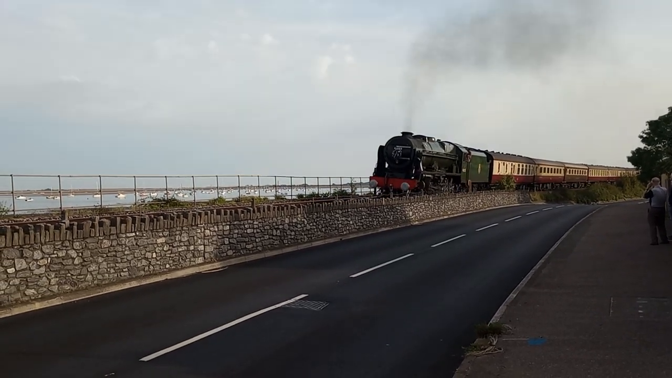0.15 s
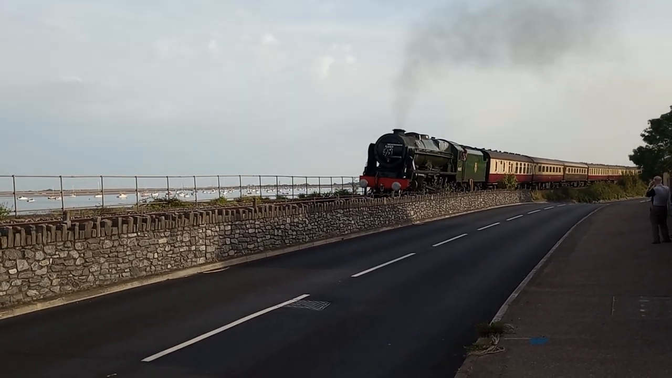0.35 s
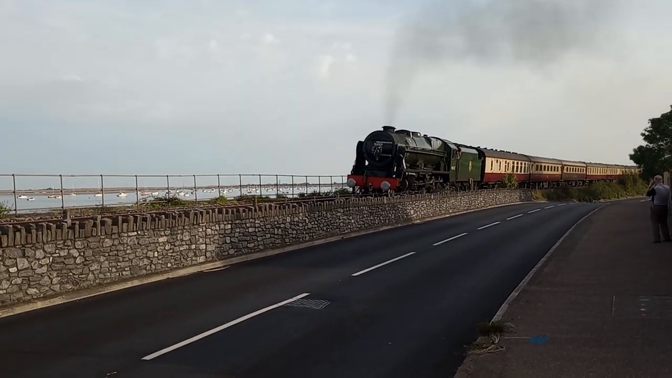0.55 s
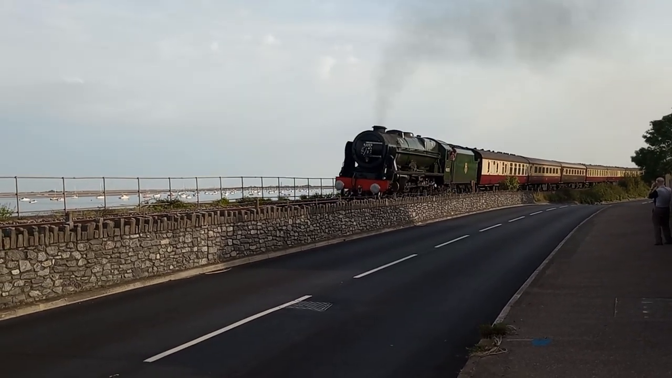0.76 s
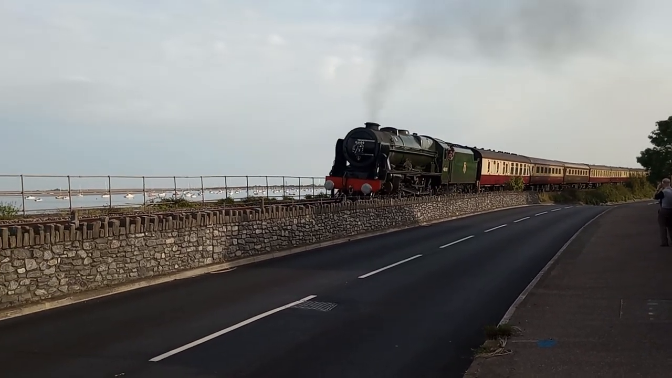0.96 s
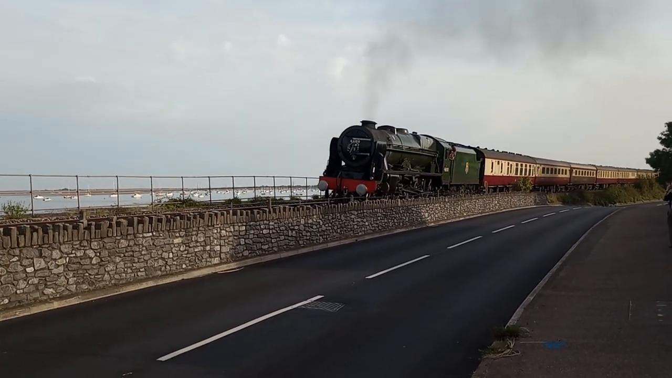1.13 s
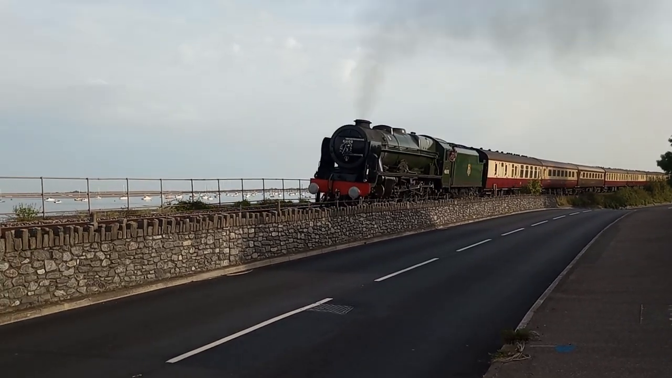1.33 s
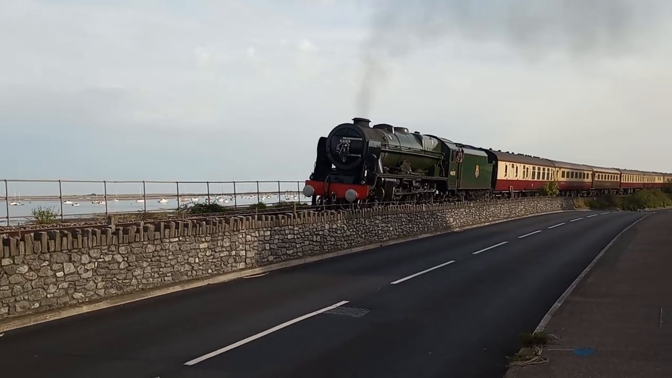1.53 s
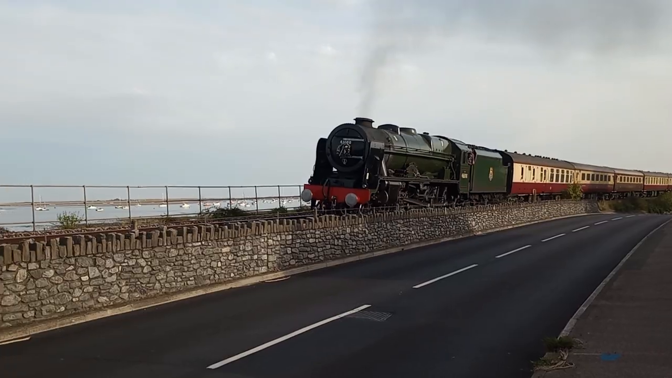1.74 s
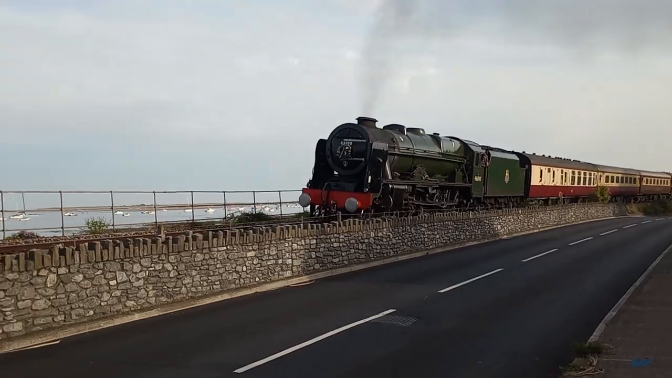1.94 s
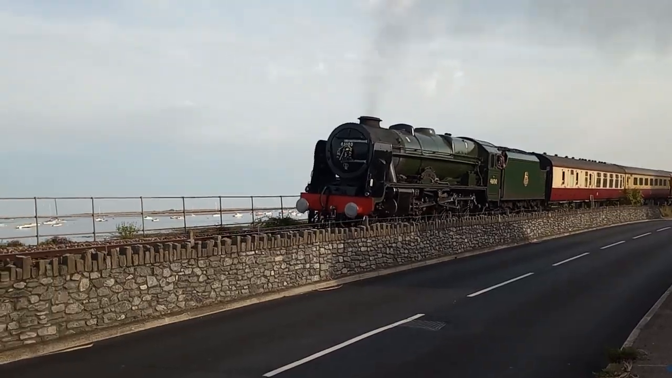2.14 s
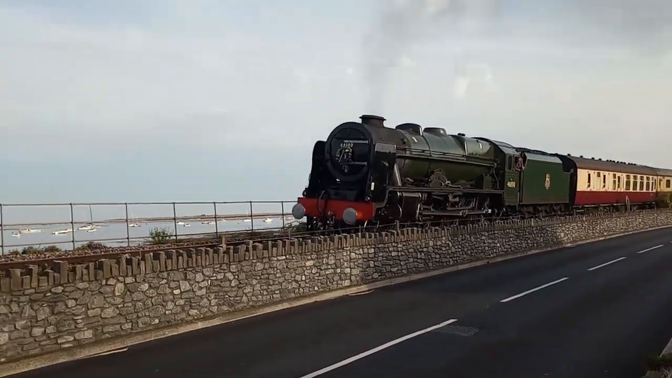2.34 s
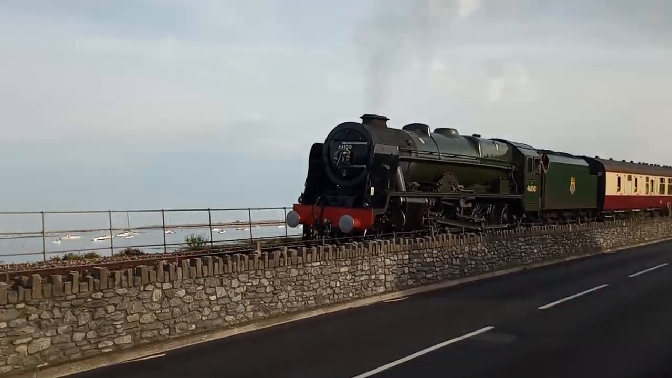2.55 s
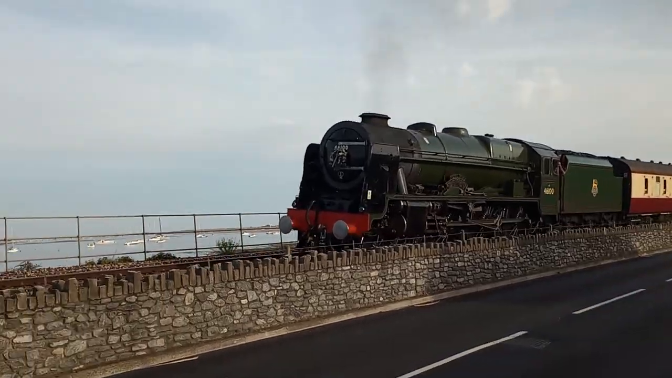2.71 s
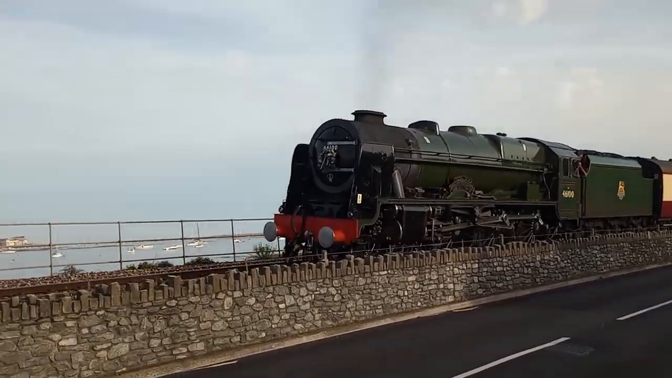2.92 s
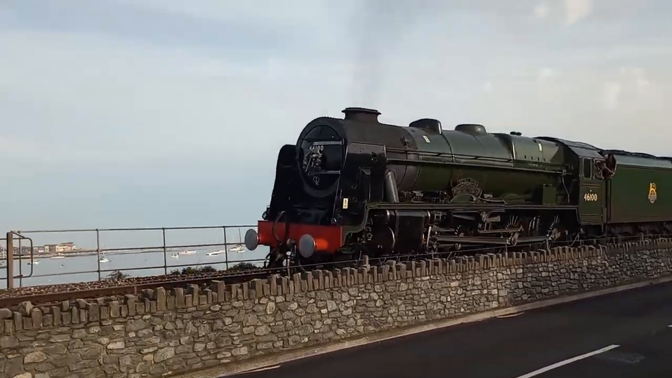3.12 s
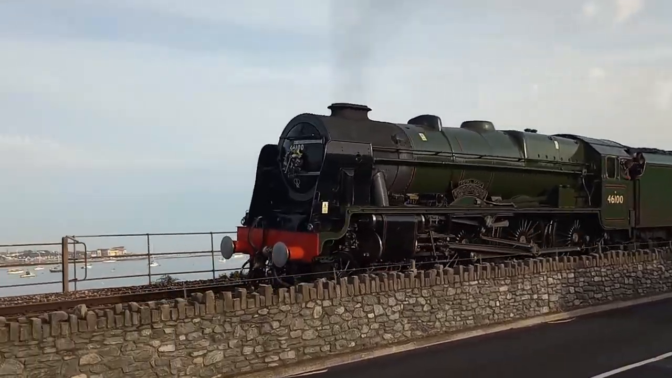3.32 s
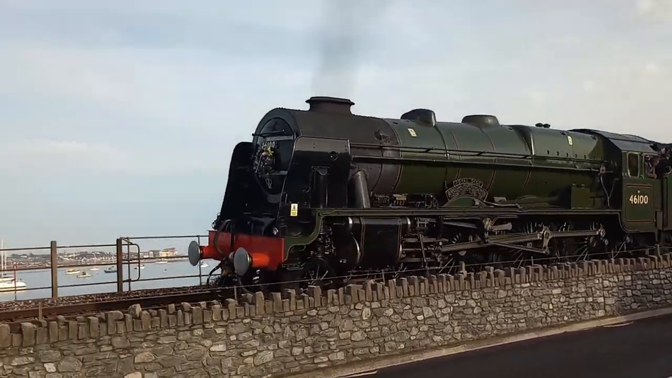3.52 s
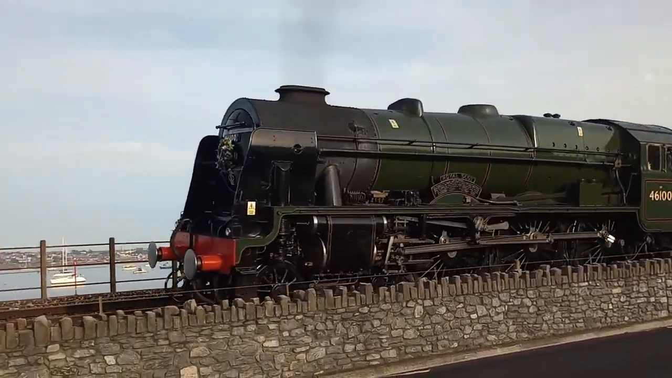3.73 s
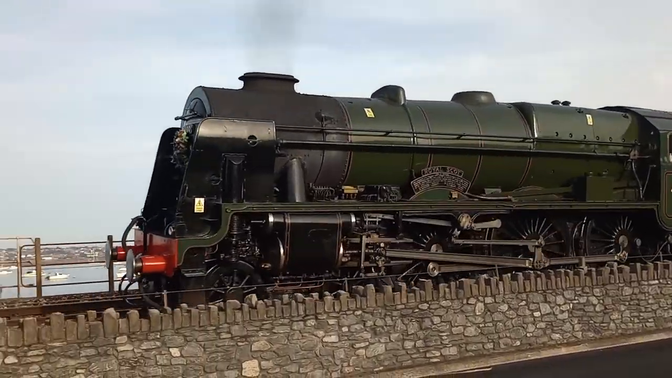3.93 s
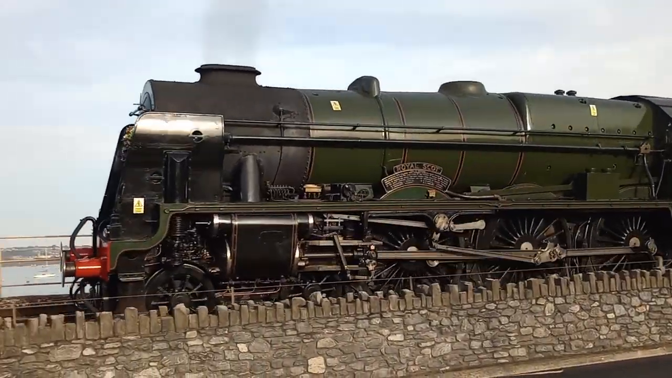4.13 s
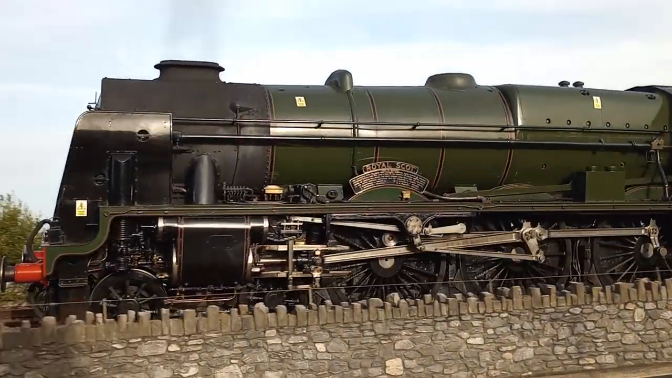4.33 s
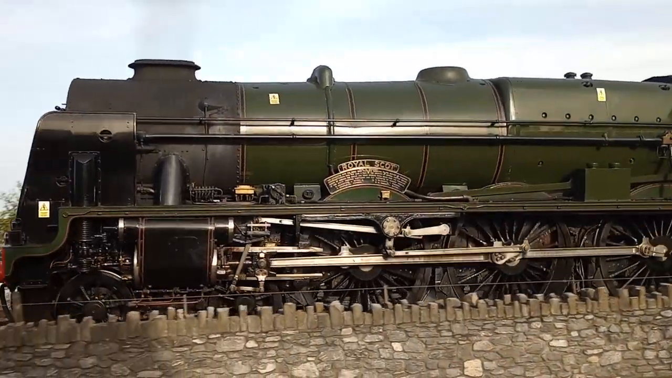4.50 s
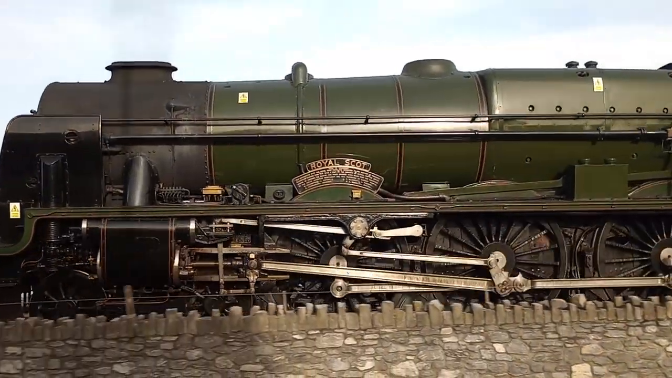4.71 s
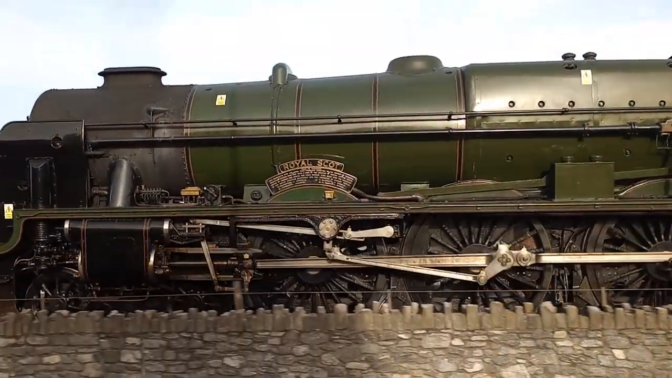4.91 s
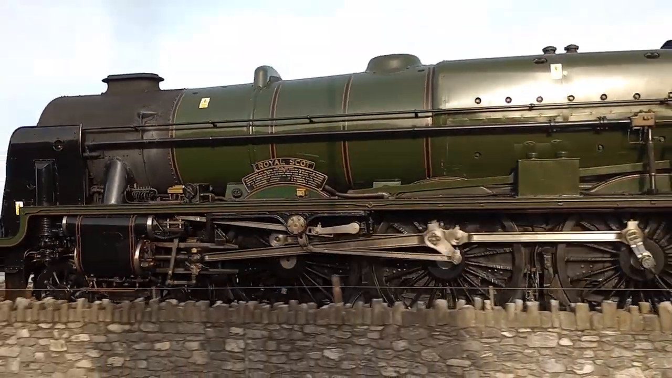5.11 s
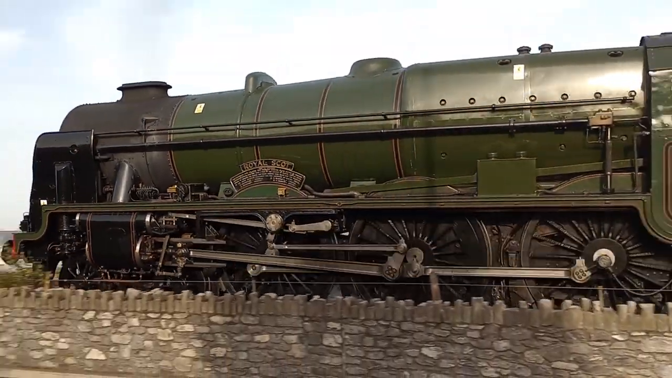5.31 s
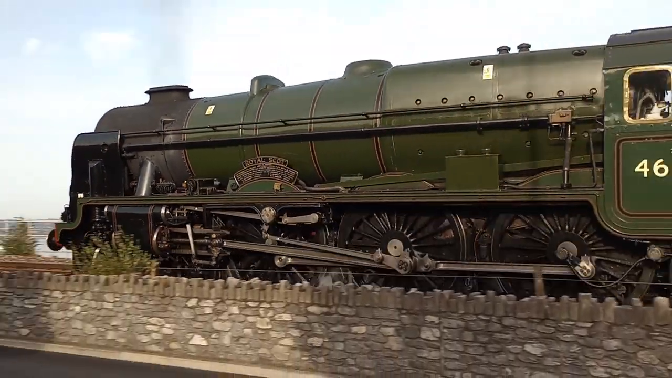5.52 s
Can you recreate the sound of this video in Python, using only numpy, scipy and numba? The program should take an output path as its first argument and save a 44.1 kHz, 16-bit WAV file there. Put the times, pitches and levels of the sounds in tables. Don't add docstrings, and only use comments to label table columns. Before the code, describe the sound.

Rapid breathy exhaust beats boom through a chimney, uneven in strength but steady in pace. Low rumble and leaking steam fill the gaps, with tiny high chirps in the first two seconds. The engine grows steadily louder and clearer, passing close from about four seconds with singing rails, wheel noise and three late metal knocks. Open roadside, short reflections from wall and road, heard on a phone's stereo microphones.

```python
import sys
import numpy as np
from scipy import signal
from scipy.fft import rfft, irfft, next_fast_len
from scipy.io import wavfile
from scipy.ndimage import uniform_filter1d, map_coordinates
from numba import njit

SR = 44100
rng = np.random.default_rng(int(sys.argv[2]) if len(sys.argv) > 2 else 0)


def volts_from_decibels(level):
    exponent = np.asarray(level, float) / 20
    return 10 ** exponent


def generate_wav(signal):
    frames = np.transpose(np.atleast_2d(signal))
    scaled = np.clip(frames, -1, 1) * 32767
    pcm = np.round(scaled).astype(np.int16)
    wavfile.write(sys.argv[1], SR, pcm)


N = 245195


def unit(x):
    return x / np.sqrt(np.mean(x ** 2))


def blend(far_near, near):
    far, close = far_near
    return far + (close - far) * near


def curves(table):
    s, *columns = np.transpose(table)
    return [np.interp(np.arange(N) / SR, s, c) for c in columns]


def walk(rate):
    hold = int(SR / rate)
    steps = np.repeat(rng.standard_normal(N // hold + 1), hold)
    return 1.13 * uniform_filter1d(uniform_filter1d(steps, hold), hold)[:N]


def colour(x, points):
    size = next_fast_len(N)
    hz, db = np.transpose(points)
    log_f = np.log(np.maximum(np.arange(size // 2 + 1) * SR / size, 1))
    gain = volts_from_decibels(np.interp(log_f, np.log(hz), db, left=-90))
    return irfft(rfft(x, size) * gain, size)[..., :N]


def split(x, low_hz, high_hz):
    band = signal.butter(3, [low_hz, high_hz], "band", fs=SR, output="sos")
    return unit(signal.sosfilt(band, x))


@njit
def svf(x, hz, width):
    y, b, l = np.empty_like(x), np.zeros(2), np.zeros(2)
    for i in range(x.shape[1]):
        g, k = np.tan(np.pi * hz[i] / SR), width / hz[i]
        for c in range(2):
            v = (b[c] + g * (x[c, i] - l[c])) / (1 + g * (g + k))
            b[c], l[c], y[c, i] = 2 * v - b[c], l[c] + 2 * g * v, k * v
    return y


# f/Hz, level/dB
SCATTER = [(60, -28), (200, -27), (380, -14), (700, -11.5), (1300, -5.8), (2400, -5.5), (4400, -3.5),
           (15000, -1)]


def air():
    shared, scattered = rng.standard_normal((2, N))
    scattered = colour(scattered, [(1, SCATTER[0][1])] + SCATTER)
    return shared + np.array([[1], [-1]]) * scattered


# t/s, nearness [0-1], blast level/dB
PASS = [(0, .01, -31), (.35, .02, -28), (.8, .08, -29.5), (1.2, .1, -27), (1.6, .2, -25), (2.0, .43, -23.5),
        (2.3, .5, -23), (2.6, .45, -22), (3.0, .55, -21.5), (3.3, .75, -18), (3.75, 1.07, -17),
        (4.1, .88, -18.5), (4.45, .97, -18.5), (4.75, .95, -17.6), (5.15, .86, -18), (5.56, .92, -19.5)]


def approach():
    return curves(PASS)


TURNS_S = [-0.397, 0.34, 1.077, 1.809, 2.538, 3.256, 3.977, 4.699, 5.438, 6.17]
# place in the turn [0-1], length [ms], strength level/dB,
# brightness level/dB, boom level/dB
PORTS = [
    (0, 67, 1.5, -.6, -2.5),
    (.159, 64, -.2, -.8, .4),
    (.331, 72, .6, -.9, -.3),
    (.492, 64, -.6, 1.8, -.4),
    (.657, 72, -4, .6, 1.5),
    (.825, 66, .6, -.3, -.3),
]
# t/s, strength level/dB, brightness level/dB, boom level/dB
ACCENTS = [(0.09, -0.7, -2.2, 1.5), (0.46, 1.9, 0.5, -3.5), (0.58, 3.0, 1.2, -0.3), (0.7, 2.9, 3.6, 5.2),
           (0.82, 2.7, -1.5, -2.1), (0.95, 1.8, -1.6, -0.3), (1.08, -1.8, 0.2, 5.4), (1.19, -0.9, 2.1, 1.2),
           (1.32, 1.1, -3.0, -7.5), (1.44, 1.6, -4.1, -5.1), (1.68, -2.5, -0.2, -3.9),
           (1.92, 1.5, -2.3, 1.7), (2.17, 1.9, -4.1, 1.0), (2.29, 5.1, -8.4, -2.7), (2.41, 1.8, -3.0, 2.9),
           (2.54, 1.9, -3.8, -1.0), (2.78, -0.5, 3.8, 9.4), (2.89, 1.6, -2.2, 0.7), (3.01, 1.0, 1.8, -2.2),
           (3.26, -0.1, 1.3, 6.9), (3.61, 1.3, 3.4, 3.5), (3.73, 2.2, -0.8, -4.4), (3.98, -0.6, 1.8, 2.5),
           (4.22, 1.3, -2.6, 0.6), (4.45, 2.6, -1.7, -0.5), (4.7, 1.3, -1.8, 1.8), (4.82, -1.2, -1.9, 1.1),
           (4.94, -2.2, 2.1, 3.3), (5.18, -3.9, 0.1, -1.3), (5.31, -2.3, -2.2, 3.1)]


def beats():
    place, *rest = np.transpose(PORTS)
    start = (np.array(TURNS_S[:-1])[:, None] + np.diff(TURNS_S)[:, None] * place).ravel()
    rows = np.column_stack([start, np.tile(rest, len(TURNS_S) - 1).T])
    rows = rows[(start > -.1) & (start < N / SR)]
    accents = np.array(ACCENTS)
    nearest_beat = np.abs(rows[:, :1] - accents[:, 0]).argmin(axis=0)
    rows[nearest_beat, 2:] += accents[:, 1:]
    return rows.T


def at_beats(curve):
    return curve[np.clip((beats()[0] * SR).astype(int), 0, N - 1)]


LENGTH_FAR_NEAR = (1.15, .9)


def puffs(level_db, late_s=0., power=1.):
    rise_s, fall_s, sag_s = .031, .038, .15
    t, flow = np.arange(N) / SR, np.zeros(N)
    starts, lengths_ms = beats()[:2]
    lengths_ms = lengths_ms * blend(LENGTH_FAR_NEAR, at_beats(approach()[0]))
    for start, ms, db in zip(starts, lengths_ms, level_db):
        i = slice(max(int((start - .1) * SR), 0), int((start + .3) * SR))
        age = t[i] - start - late_s
        opening = .5 + .5 * np.tanh(2 * age / rise_s)
        closing = .5 - .5 * np.tanh(2 * (age - ms / 1000) / fall_s)
        flow[i] += volts_from_decibels(db) * (1.253 * opening * closing * np.exp(-age / sag_s)) ** power
    return flow


# f/Hz, width [Hz]
OVERTONES = [(510, 183), (700, 68), (960, 89), (1350, 200), (1600, 340), (1920, 114)]
# far level/dB, near level/dB
OVERTONE_FAR_NEAR_DB = [(1.5, -5), (-7, -3.5), (5, .6), (3, -12), (-16, 1.5), (4, -1.5)]
# f/Hz, width [Hz], level/dB
NOZZLE = [(2413, 250, -7.5), (3250, 500, -8)]


def column(jet, near, shift_db=0.):
    modes = [(hz, width, blend(pair, near) + shift_db + 1.5)
             for (hz, width), pair in zip(OVERTONES, OVERTONE_FAR_NEAR_DB)] + NOZZLE
    voiced = jet
    for hz, width, db in modes:
        flare = volts_from_decibels(db + 3.2 * walk(16))
        voiced = voiced + flare * svf(jet, hz * (1 + .045 * walk(9)), width)
    return voiced


# f/Hz, level/dB per Hz
JET = [(250, 8), (400, -3), (1100, -10.5), (2000, -13.5), (3200, -16.5), (5300, -27.5), (9000, -35),
       (11000, -40), (15500, -24)]
# t/s, lowest note f/Hz, level/dB
CHIMNEY = [(0, 235, -25), (.3, 240, -30), (.8, 250, -26), (1.6, 237, -28), (2.2, 238, -29.5),
           (2.55, 290, -28), (2.85, 290, -19.5), (3.3, 269, -18), (3.7, 232, -15.5), (4.1, 224, -14.5),
           (4.4, 222, -15), (4.85, 233, -13), (5.15, 236, -14), (5.56, 245, -12)]


def exhaust(near, blast_db):
    _, _, strength_db, bright_db, boom_db = beats()
    note_hz, note_db = curves(CHIMNEY)
    near_beat = at_beats(near)
    roar_db = at_beats(blast_db) + strength_db
    bark_db = roar_db + blend((-2.2, -4.5), near_beat) + .4 * bright_db
    hiss_db = roar_db + blend((-19.5, -18.3), near_beat) + bright_db
    voiced = column(colour(air(), JET), near)
    eddies_db = 1.3 * walk(60)
    roar = split(voiced, 316, 1140) * puffs(roar_db + 2) * volts_from_decibels(1.26 * walk(40))
    bark = split(voiced, 1190, 3470) * puffs(bark_db + 2, power=1.08) * volts_from_decibels(.66 * walk(50))
    hiss = split(voiced, 3530, 13300) * puffs(hiss_db + 4, power=1.5) * volts_from_decibels(1.97 * walk(70))
    boom_width_hz, boom_late_s = 72., .0078
    drive = air() * puffs(at_beats(note_db) + boom_db, boom_late_s)
    boom = svf(svf(drive, note_hz, boom_width_hz), note_hz, 140.) * np.sqrt(SR / boom_width_hz / 2)
    return (roar + bark + hiss) * volts_from_decibels(eddies_db) + boom


# delay t/s, level/dB
ECHO = [
    (.031, -10),
    (0.057, -18.5),
    (.092, -18),
]


def echoes(blast):
    return sum(volts_from_decibels(db) * np.pad(blast, ((0, 0), (int(s * SR), 0)))[:, :N] for s, db in ECHO)


# f/Hz, level/dB per Hz
RUMBLE = [(25, -45), (40, -13.5), (70, 0.5), (120, 2.5), (170, 3.5), (260, -36.5)]
# f/Hz, level/dB per Hz
ROLLING = [(280, -32), (450, 2), (960, -6.5), (1900, -8), (3200, -14.5), (5300, -36.5), (8000, -32)]
# f/Hz, level/dB per Hz
LEAK = [(3000, -10), (4500, 1), (6500, -4), (9000, -6), (11000, -30), (13000, -30)]
# t/s, leak level/dB, rumble level/dB, rolling level/dB
GEAR = [(0, -64, -35, -33), (.3, -56, -35.5, -35), (.55, -51, -31, -32), (.87, -47, -32.5, -32),
        (1.25, -47.5, -32, -29.5), (1.6, -44.5, -32, -29), (2.1, -47, -28, -30), (2.6, -48.5, -27, -31),
        (3.0, -50, -32, -28), (3.4, -43, -32.5, -24), (3.8, -43, -34, -23.5), (4.55, -43, -32.5, -22),
        (4.85, -40, -28, -20.5), (5.2, -40, -32, -22), (5.56, -40, -31, -20)]


def running_gear(near):
    leak_db, rumble_db, rolling_db = curves(GEAR)
    note_hz, note_db = curves(CHIMNEY)
    stroke = puffs(0 * beats()[0], .0075)
    rumble = unit(colour(air(), RUMBLE) * (1 + .5 * stroke)) * volts_from_decibels(rumble_db + 1.9 * walk(9))
    wander_hz = note_hz * (1 + .05 * walk(12))
    drone = unit(svf(svf(air(), wander_hz, 62.), wander_hz, 140.))
    drone = drone * volts_from_decibels(note_db - 5 + 3.3 * walk(24))
    rolling = unit(column(colour(air(), ROLLING), near, -4.5))
    rolling = rolling * volts_from_decibels(rolling_db - 3.5 + 2.4 * walk(14))
    leak = unit(colour(air(), LEAK) * (1 + .64 * stroke)) * volts_from_decibels(leak_db + .2 + 1.8 * walk(12))
    return rumble + drone + rolling + leak


# f/Hz, level/dB per Hz
WISP = [(7000, -32), (9500, -12), (11000, -9), (13000, -3.5), (15000, 0), (15800, 0)]


def wisps(near):
    level_db, swell_db = (-67, -37), (-7, -.5)
    stroke = puffs(blend(swell_db, at_beats(near)), .0096) + .92
    return colour(air(), WISP) * stroke / 1.26 * volts_from_decibels(blend(level_db, near) + 1.5 * walk(25))


# t/s, f/Hz, level/dB
SQUEAK = [
    (0.36, 9400, -79),
    (0.37, 9654, -70),
    (0.414, 9569, -68),
    (0.426, 9615, -76),
    (0.444, 9668, -63),
    (0.57, 9688, -73),
    (0.59, 9486, -81),
]


def squeak():
    hz, db = curves(SQUEAK)
    t = np.arange(N) / SR
    on = uniform_filter1d(1. * ((t > SQUEAK[0][0]) & (t < SQUEAK[-1][0])), 200)
    whistle = np.sin(2 * np.pi * np.cumsum(hz) / SR)
    return np.sqrt(2) * on * volts_from_decibels(db + 1 + 1.5 * walk(60)) * whistle


# t/s, starting f/Hz, level/dB
CHIRPS = [
    (.615, 4760, -54),
    (.735, 4720, -54),
    (.995, 4840, -53),
    (1.135, 4450, -53),
    (1.255, 4500, -54),
    (1.335, 4800, -55),
    (1.515, 4550, -50),
    (1.605, 4600, -51),
    (1.735, 4550, -48),
]


def chirps():
    length_s, fall = .033, .05
    t, out = np.arange(N) / SR, np.zeros(N)
    for start, hz, db in CHIRPS:
        share = np.clip((t - start) / length_s, 0, 1)
        phase = 2 * np.pi * np.cumsum(hz * (1 - fall * share)) / SR
        out += volts_from_decibels(db) * np.sin(np.pi * share) * np.sin(phase)
    return out * volts_from_decibels(1.5 + 5 * walk(300))


# t/s, f/Hz, level/dB
SING = [
    (3.93, 677, -27),
    (4.28, 708, -17),
    (4.6, 720, -21),
    (5.05, 700, -20),
    (5.31, 706, -26),
]


def singing():
    rise_s, fall_s, idle_db = .035, .07, -40
    t, (s, hz, _) = np.arange(N) / SR, np.transpose(SING)
    swells = sum(volts_from_decibels(db) * np.exp(-np.abs(t - at) / np.where(t < at, rise_s, fall_s)) for at, _, db in SING)
    idle = volts_from_decibels(idle_db) * uniform_filter1d(1. * ((t > s[0]) & (t < s[-1])), SR // 5)
    return unit(svf(air(), np.interp(t, s, hz), 32.)) * (swells + idle) * volts_from_decibels(-2.5)


# t/s, level/dB, brightness [dB per octave]
CLANKS = [
    (5.313, -25, 8.5),
    (5.39, -24, 0),
    (5.445, -25.5, -3),
]
# f/Hz, level/dB, t60 [s]
ROD = [(490, -8, .12), (778, 4.5, 0.15), (1017, 2, 0.29), (1170, 0.5, 0.25), (1450, 4.5, 0.093),
       (1660, 0.5, 0.13), (2300, -9, .1)]


def clanks():
    out = np.zeros(N)
    for start, db, tilt_db in CLANKS:
        age = np.arange(N - int(start * SR)) / SR
        for hz, mode_db, t60 in ROD:
            phase = 2 * np.pi * (hz * age + rng.random())
            size = volts_from_decibels(db + mode_db + tilt_db * np.log2(hz / 1000))
            out[-len(age):] += size * np.sin(phase) * (1 - np.exp(-age / .0042)) * 1000. ** (-age / t60)
    return out * volts_from_decibels(4 * walk(250))


def distant(x, near):
    low = signal.sosfilt(signal.butter(2, 6500, fs=SR, output="sos"), x)
    return low + volts_from_decibels(blend((-6.2, -.6), near)) * (x - low)


# far f/Hz, near f/Hz, width [Hz], far and near depth
DIPS = [(380, 300, 120, .95, -1.1), (1150, 1100, 80, .65, -1.9), (800, 830, 45, -1.5, .4),
        (1300, 1260, 90, -1.2, .55)]


def wall(sound, near):
    for far_hz, near_hz, width, *depth in DIPS:
        dip = svf(sound, blend((far_hz, near_hz), near), width)
        sound = sound - np.clip(blend(depth, near), 0, 1) * dip
    return sound


# t/s, f/Hz of the dip, depth [0-1]
BOUNCE = [
    (0, 830, .05),
    (.8, 860, .15),
    (1.15, 880, .9),
    (1.8, 790, .65),
    (2.4, 700, .8),
    (2.8, 560, .55),
    (3.2, 450, .85),
    (3.7, 380, .5),
    (4.5, 345, .55),
    (5.56, 365, .4),
]


def road(sound):
    hz, depth = curves(BOUNCE)
    return sound - np.clip(depth, 0, 1) * svf(sound, hz, 90.)


# t/s, left lag [samples], left minus right level/dB
BEARING = [
    (0, 2.0, 0.2),
    (1.2, 2.2, 0),
    (1.8, 2.8, 0),
    (3.5, -1.5, -0.1),
    (4.0, 0, -0.2),
    (4.6, -4.5, 0),
    (5.56, -3.5, 0.6),
]
# f/Hz, left lead [radians]
SHADOW = [(1, 0.12), (300, -0.13), (800, -0.26), (1550, 0.78), (3000, -0.13), (4300, 0.63), (5400, -.6),
          (6700, 0.79)]


def two_ports(sound):
    lag, pan_db = curves(BEARING)
    size, (hz, lead) = next_fast_len(N), np.transpose(SHADOW)
    turn = np.exp(.5j * np.interp(np.arange(size // 2 + 1) * SR / size, hz, lead))
    ports = []
    for x, side in zip(sound, (1, -1)):
        bent = irfft(rfft(x, size) * turn ** side, size)
        moved = map_coordinates(bent, [np.arange(N) - side * lag / 2], order=3, mode="nearest")
        ports.append(volts_from_decibels(side * pan_db / 2) * moved)
    return np.array(ports)


def scene():
    near, blast_db = approach()
    blast = exhaust(near, blast_db)
    engine = blast + echoes(blast) + running_gear(near)
    sound = distant(engine, near) + singing() + clanks()
    sound = road(wall(sound, near))
    return two_ports(sound) + wisps(near) + squeak() + chirps()


def top_cut(x):
    return signal.sosfilt(signal.butter(12, 16870, fs=SR, output="sos"), x)


def record(dry):
    left = colour(dry[0], [(1, .31), (6000, -.2), (13000, -3.6)])
    x = np.tanh(1.136 * np.array([left, dry[1]])) / 1.075
    top_hz = 15770
    x = colour(x, [(1, 0), (top_hz, 0), (top_hz + 12, -110)])
    return top_cut(x)


dry = scene()
out = record(dry)
generate_wav(out)
```